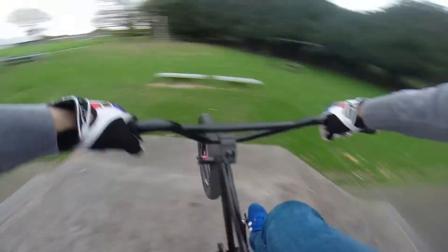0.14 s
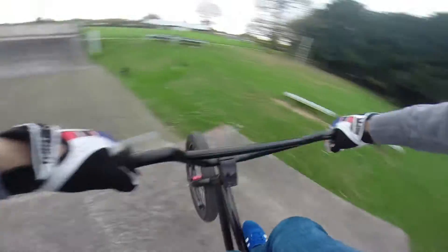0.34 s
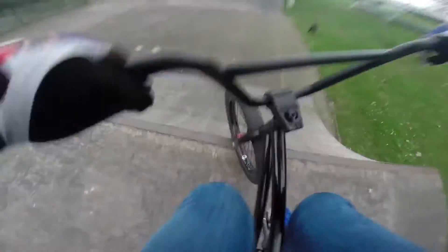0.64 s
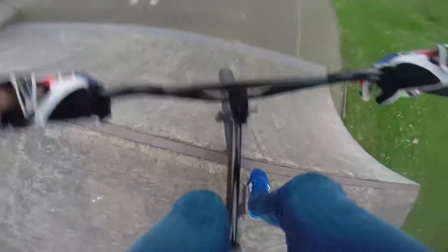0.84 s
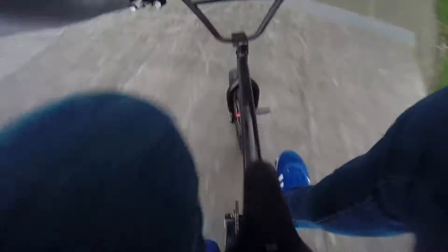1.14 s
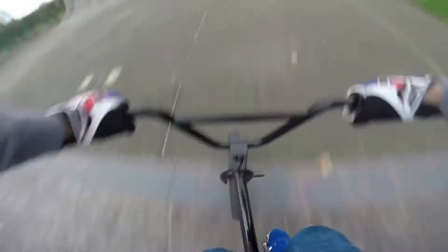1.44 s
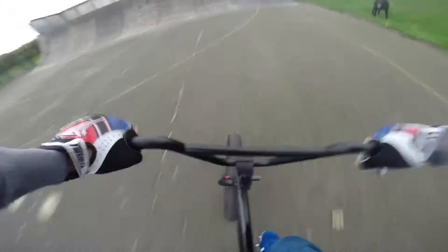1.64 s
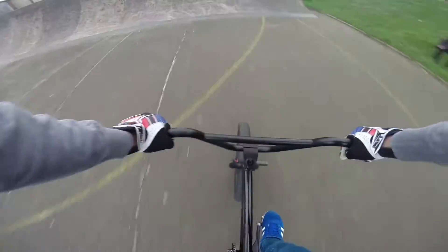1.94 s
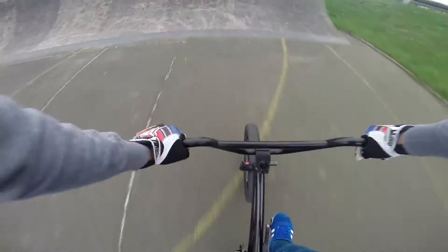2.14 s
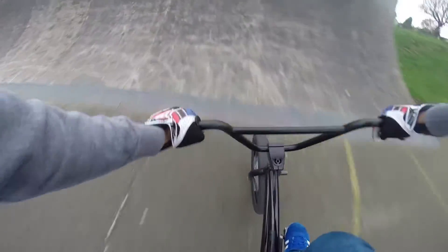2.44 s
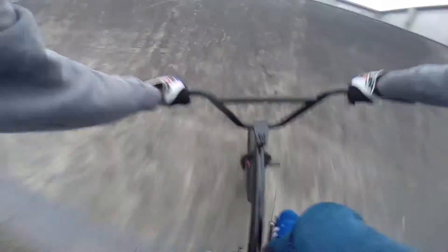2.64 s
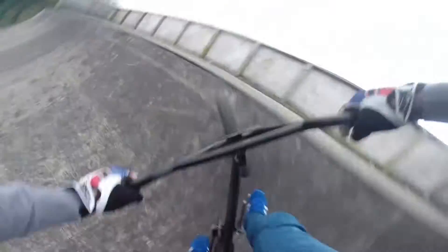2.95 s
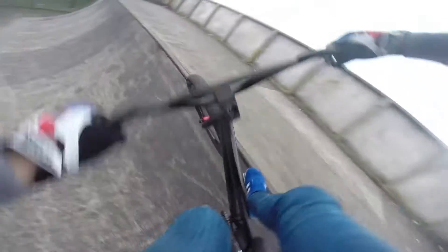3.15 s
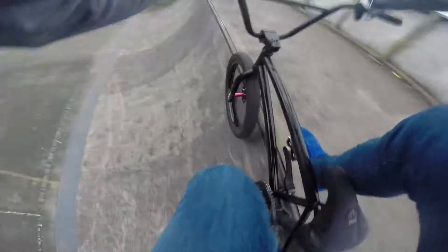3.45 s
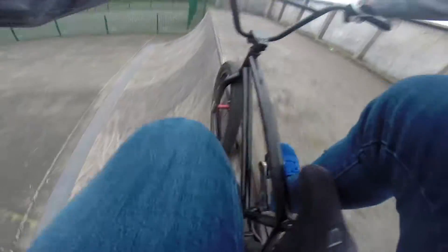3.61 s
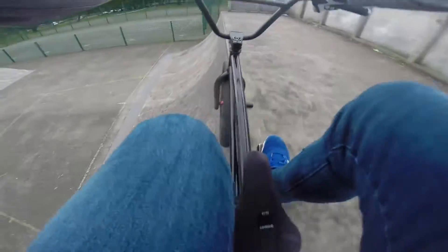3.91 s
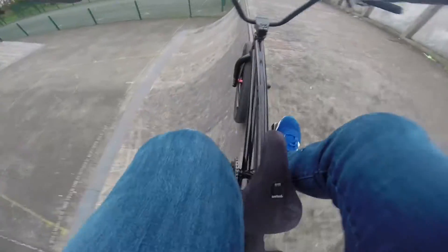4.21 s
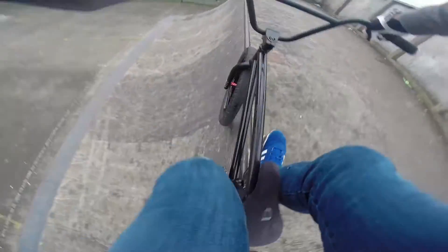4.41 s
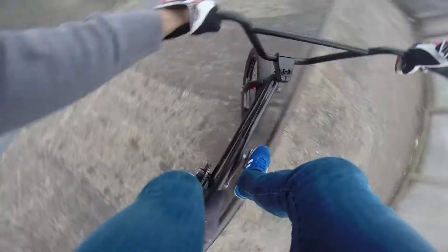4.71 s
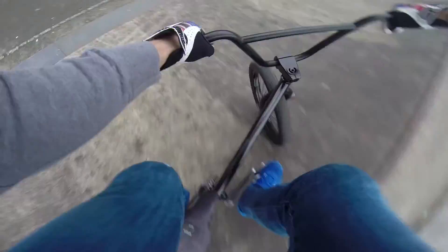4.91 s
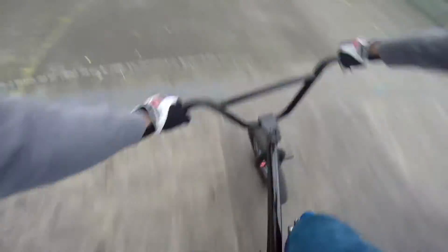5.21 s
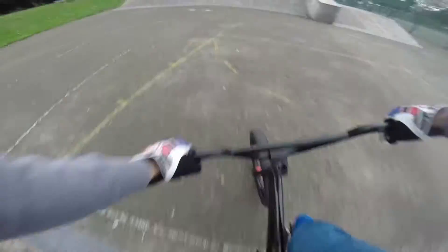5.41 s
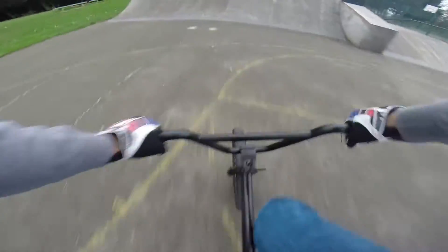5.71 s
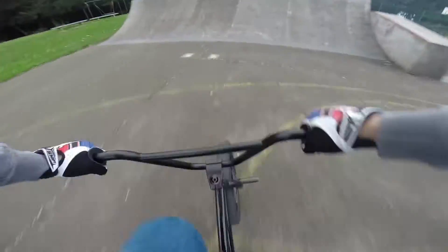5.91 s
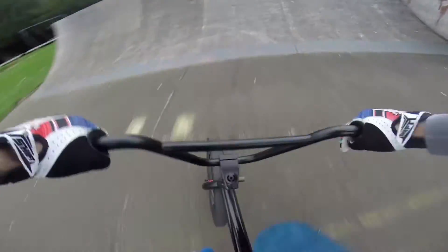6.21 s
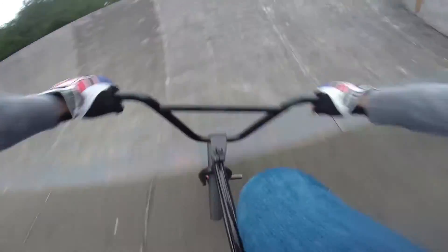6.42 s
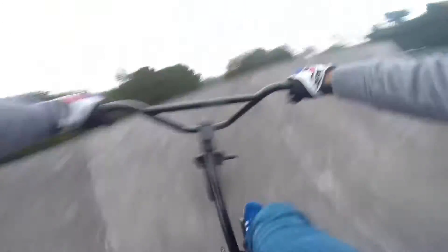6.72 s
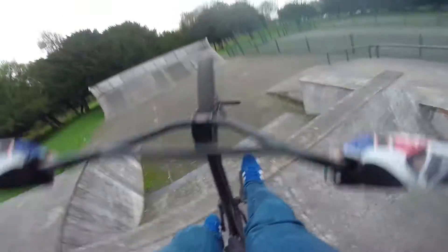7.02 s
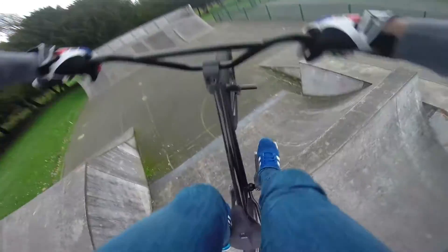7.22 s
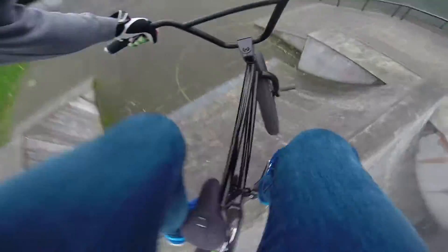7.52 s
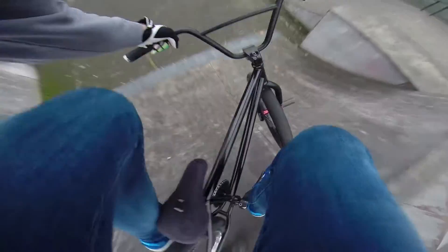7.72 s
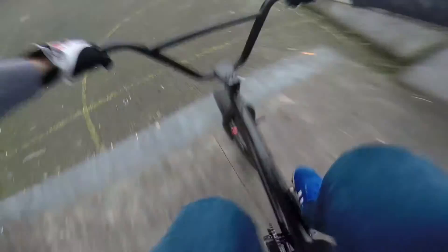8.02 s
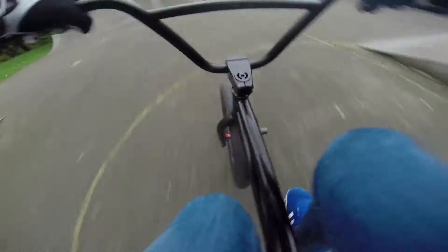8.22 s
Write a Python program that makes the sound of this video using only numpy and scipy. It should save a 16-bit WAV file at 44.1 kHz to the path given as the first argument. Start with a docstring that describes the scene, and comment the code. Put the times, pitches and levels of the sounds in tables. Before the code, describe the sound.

A small bike rides concrete ramps, captured by a boxed-in microphone on the rider's body. Deep soft thumps and dull tyre hiss come first, then loud plastic cracks and a big low jolt. Two metallic clanks lead into a short, weakening scrape with a thin squeal. The freewheel ticks and whirrs, more knocks snap, and a cluster of violent thuds and clatter ends in quiet rolling. Faint electronic whine and hiss stay underneath.

```python
"""Concrete ramps: a small bike is ridden, heard by a microphone sealed in a plastic case on the rider's chest.
Damped bounces and tremor of the body shake it; noise makes the rumble and hiss of the tyres through the case.
Struck modes ring in the knocking case and in a steel axle peg that clanks, grinds and sings on a ramp edge.
Ticks, scuffs and low rumbles on the case are short coloured noises, the freewheel is a train of ticks,
electronics whine as thin sines and the microphone hisses faintly as banded noise."""
import sys
import numpy as np
from scipy import signal
from scipy.io import wavfile
from scipy.ndimage import map_coordinates

SR = 44100
rng = np.random.default_rng(int(sys.argv[2]) if len(sys.argv) > 2 else 0)


def wav_record(signal):
    """Record a signal, one row per channel, as 16-bit PCM in the file named by sys.argv[1]."""
    frames = np.transpose(np.atleast_2d(signal))
    bounded = np.clip(frames, -1, 1)
    # unit amplitude maps onto the largest positive 16-bit level
    quanta = np.round(bounded * 32767).astype(np.int16)
    wavfile.write(sys.argv[1], SR, quanta)


N = 368235

# All levels hold ahead of the gain and peak rounding in record(); levels of modes and spectra are relative.
# Jolts of the body: (time [s], peak level [dB], settled bounce frequency [Hz])
BODY_JOLTS = [(0.197, -25.5, 22.4), (0.543, -22, 50.5), (0.617, -19.5, 25.3), (0.675, -14, 32),
              (0.829, -14.5, 21.8), (0.911, -20.0, 23), (1.172, -15.5, 25), (1.212, -13, 40.6),
              (1.281, -17, 23.6), (1.356, -19, 28), (1.435, -18.5, 21.7), (1.566, -19.5, 20.7),
              (1.677, -22, 47), (1.84, -24, 21.8), (1.979, -28, 29), (2.148, -25.5, 40),
              (2.343, -20.5, 29.9), (2.647, -22.5, 29), (3.016, -7.5, 24.2), (3.41, -19, 25.2),
              (3.49, -19.5, 21.7), (3.547, -16.5, 43.2), (4.151, -28.5, 70.5), (4.857, -25, 23.3),
              (5.219, -25.5, 21.6), (5.278, -29.5, 23.2), (5.57, -29.5, 21.55), (5.947, -31, 24.7),
              (6.125, -25, 21.4), (6.392, -22.5, 29.9), (6.789, -15.5, 53), (6.93, -18, 24.4),
              (7.335, -28, 21.6), (7.665, -27.5, 38.2), (7.902, -7.5, 23.7), (7.954, -7.5, 54),
              (7.972, -15.5, 26.4), (8.012, -4.5, 38.9), (8.035, -7.5, 53.7)]
# Tremor of the chest between jolts: (time [s], level [dB])
TREMOR_LEVEL = [(0.0, -26.5), (0.58, -43.5), (0.74, -28), (1.16, -45.5), (1.93, -31), (3.63, -42.5),
                (3.95, -44.5), (6.74, -30.5), (7.68, -52.5), (8.12, -39), (8.35, -37.5)]
# Spectrum of the steady tremor: (frequency [Hz], density [dB per Hz])
TREMOR_SPECTRUM = [(8.8, -12), (15, 5), (27, -1), (39, -35.5), (65, -16.5), (149, -23), (200, -39),
                   (260, -69)]
# Tyre hiss through the case: (time [s], level [dB])
ROLLING_LEVEL = [(0, -50.5), (.3, -64), (.65, -51), (.98, -57), (1.37, -51), (2.16, -52.5), (2.4, -56),
                 (3.32, -56), (3.56, -42), (3.8, -47), (4.25, -54), (4.65, -58), (4.85, -54), (5.08, -57.5),
                 (5.5, -51), (6.16, -58), (6.65, -51), (7.05, -60.5), (7.5, -58), (8.35, -55)]
# Spectrum of the tyre rumble: (frequency [Hz], density [dB per Hz])
RUMBLE_SPECTRUM = [(41, -67), (70, 2), (109, 1.5), (195, -7), (388, -13), (617, -21.5), (1200, -16.5),
                   (1560, -46)]
# Case resonances that colour steady sound: (frequency [Hz], bandwidth [Hz], level [dB])
CASE_RESONANCES = [(1443, 223, -1.5), (2213, 180, 5.5), (2960, 310, -2), (3520, 174, -1), (4360, 120, -7),
                   (4790, 170, -6), (5480, 1260, -10.5), (7020, 130, -17)]
# Knocks of the case in its mount: (time [s], peak level of the crack [dB], hardness [dB per octave])
CASE_KNOCKS = [(0.185, -35, 10.5), (0.455, -36.5, 8), (0.529, -24.5, 17.5), (1.236, -28, 12),
               (1.397, -11, 3), (2.359, -30, -2.5), (2.705, -14, 4.5), (2.84, -1.5, 9.5), (2.942, -7, 6.5),
               (4.545, -37, 12), (5.337, -32, -1.5), (5.483, -15.5, 2.5), (5.934, -40, 16),
               (6.072, -35, 14), (6.135, -33.5, 13), (6.207, -35, -1), (6.625, -3, 6.5), (6.7492, -2, 11.5),
               (7.767, -30, 1), (7.788, -27, 3.5), (7.828, -26, 3), (7.866, -24.5, 5), (7.89, -24, 3.5),
               (7.902, -23, 4.5), (7.94, -20.5, 7), (7.964, -24, 14), (7.971, -4, 2), (7.982, -10.5, 0.5),
               (8.036, -9, 2.5), (8.043, -9.5, 5.5), (8.092, -15, 7), (8.101, -33, 31)]
# Modes of the struck case: (frequency [Hz], level [dB], t60 [s], at least 0.002 s in use)
CASE_MODES = [(672, 12, 0.0054), (1017, 12, 0.0035), (1387, 5.5, 0.0072), (2212, -16, 0.048),
              (2204, 4, 0.018), (3025, -6.5, 0.0092), (3615, -10, 0.0093), (4330, -6, 0.0014),
              (5010, -10, 0.0041), (6280, -21, 0.0035), (7180, -33.5, 0.0062)]
# Modes of the chest plate: (frequency [Hz], level [dB], t60 [s])
PLATE_MODES = [(149.5, 5, 0.055), (289.4, 2, 0.031)]
# Short coloured noises on the case, ticks, scuffs and low rumbles:
# (time [s], peak level [dB], colour frequency [Hz], length [s])
SHORT_NOISES = [(0.589, -31.5, 1440, 0.003), (0.591, -28.5, 104, 0.023), (0.836, -34, 1430, 0.01),
                (1.075, -33, 2300, 0.18), (1.323, -37.5, 6500, 0.011), (1.606, -34.5, 1180, 0.029),
                (1.765, -37, 1090, 0.032), (1.826, -27, 1350, 0.025), (1.846, -25, 280, 0.013),
                (2.03, -29, 1400, 0.0033), (2.073, -23, 1350, 0.0059), (2.169, -27.5, 1350, 0.0061),
                (2.666, -26, 1220, 0.042), (2.727, -26.5, 184, 0.1), (3.019, -31, 1010, 0.02),
                (3.34, -36, 1340, 0.011), (3.386, -33, 2930, 0.021), (3.442, -30.5, 2270, 0.0066),
                (3.468, -30.5, 3310, 0.0069), (3.506, -23.5, 3100, 0.017), (4.231, -30.5, 1380, 0.0042),
                (4.73, -37, 2380, 0.26), (5.19, -42, 4380, 0.16), (6.544, -27, 433, 0.047),
                (6.592, -21.5, 1620, 0.031), (6.658, -30, 248, 0.069), (6.782, -36.5, 905, 0.0088),
                (6.845, -40.5, 1290, 0.017), (7.907, -25.5, 2170, 0.11), (8.018, -24.5, 2185, 0.0074)]
# Peg meets ramp edge: (time [s], strength [dB], pitch factor [ratio], chatter decay [s], free ringing [s])
PEG_CLANKS = [(3.537, -14.5, 1.055, 0.062, 0.029), (3.571, -6, 1.001, 0.0086, 0.097)]
# Modes of peg and axle: (frequency [Hz], level [dB], t60 [s])
PEG_MODES = [(1583, -1, 0.12), (1643, 5, 0.047), (1910, 16.5, 0.0087), (2800, 17, 0.0042), (4240, 3, 0.05),
             (4390, -3, 0.22), (7300, -26, 0.39), (7470, -2, 0.015), (11500, -24, 0.28)]
# Resonances of the grinding peg, each passed twice: (frequency [Hz], bandwidth of one pass [Hz], level [dB])
GRIND_RESONANCES = [(805, 750, -8.5), (1475, 350, 0.5), (2120, 450, -1.5), (2660, 330, 0.5),
                    (3350, 136, 3.5), (5800, 2100, -21.5)]
# Freewheel: (time [s], pawl rate [ticks per s], level through the frame [dB])
FREEWHEEL_COURSE = [(0, 61, -88), (1.1, 163, -60), (1.6, 276, -58.5), (2.6, 193, -54.5), (3.1, 89, -58.5),
                    (3.5, 94, -49), (3.7, 79, -49), (4.3, 34, -85), (5.0, 46, -61.5), (5.2, 75, -54.5),
                    (5.6, 175, -54.5), (6.1, 170, -70), (7.05, 78, -68.5), (7.3, 85, -55), (7.6, 67, -57.5),
                    (7.85, 80, -52), (8.35, 83, -60)]
# Pawl modes in the frame, later weighted by frequency: (frequency [Hz], level [dB], t60 [s])
PAWL_FRAME_MODES = [(2300, -3, .012), (2940, -6, .02), (3330, 1.5, .014), (4300, -10, .015),
                    (4660, -4, .016), (5005, -4, .02), (5750, -13, .018)]
# Pawl modes in air, later weighted by frequency: (frequency [Hz], level [dB], t60 [s], at least 0.002 s in use)
PAWL_AIR_MODES = [(7160, -5.5, 0.008), (9940, -5.5, 0.00097), (12300, -6.5, 0.0017)]
# Spectrum of the faint steady microphone hiss: (frequency [Hz], density [dB per Hz])
MIC_HISS_SPECTRUM = [(2940, -17), (5000, -19), (7820, 10), (9110, -11), (11100, -26), (15200, -14)]
# Overtones of the electronics: (frequency [Hz], mean level [dB rms])
WHINE_TONES = [(5852, -77.5), (8780, -75.5), (11705, -86), (14626, -81)]

BOUNCE_CYCLES, PUSH_CYCLES = 4.04, 0.49   # bounces to die by 60 dB; softness of the push
STIFF_CYCLES, SLACKEN_CYCLES = 0.31, 0.17   # squeezed chest starts quicker: cycles gained, and over how many
RUMBLE_OVER_HISS_DB = 5
# rumble left by a blow: levels below the peak of a knock and of a jolt, time to die by 1/e
SHUDDER_DB, JOLT_SHUDDER_DB, SHUDDER_S = -15.5, -25, 0.0091
# chest plate: push level at a full blow, dB lost per dB of a softer knock, delay
THUD_DB, THUD_GROWTH, THUD_LAG_S = -13, 1.21, 0.00647
PEG_SHARP, PEG_SETTLE_S = 0.0485, 0.0121   # under load the ring starts sharp by this share and sags
GRIND_START_S, GRIND_LIFT_START_S, GRIND_DB = 3.65, 4.194, -42.5   # level at the start
GRIND_RISE_S, GRIND_FADE_DB_PER_S, GRIND_LIFT_S = 0.01, 17, 0.12
GRIND_RUMBLE_DB = 0   # rumble of the grind against its hiss
SQUEAL_S, SQUEAL_LENGTH_S, SQUEAL_HZ, SQUEAL_DB = 3.9, 0.11, 4306, -56.5
HUB_AIR_DB = -14   # through the air, against the frame
MIC_HISS_DB = -83.5
CUTOFF_HZ = 15400


def from_db(db):
    """Logarithmic level: 20 dB is a factor of ten in amplitude."""
    return 10 ** (np.asarray(db) / 20)


def rms_one(x):
    """Normalisation: scale to a root mean square of 1."""
    return x / np.sqrt(np.mean(x ** 2) + 1e-20)


def in_time(rows):
    """Linear interpolation: table columns as curves, one value a sample."""
    s, *columns = np.transpose(rows)
    return [np.interp(np.arange(N) / SR, s, c) for c in columns]


def drift(rate):
    """Low-passed noise: a slow random curve of spread 1, with its corner near rate in Hz."""
    r = np.exp(-40 * np.pi * rate / SR)   # one step is 20 samples
    white = rng.standard_normal(N // 20 + 4002)
    slow = signal.lfilter([1], [1, -2 * r, r * r], white)[4000:]   # past the start-up
    return np.interp(np.arange(N) / 20, np.arange(len(slow)), rms_one(slow))


def ring(clicks, hz, t60):
    """Damped oscillator: a unit click sets off a decaying sine of height 1; t60 is at least 2 ms."""
    r = from_db(-60 / (max(t60, .002) * SR))
    w = 2 * np.pi * hz / SR
    return signal.lfilter([0, np.sin(w)], [1, -2 * r * np.cos(w), r * r], clicks + 1e-18)


def resonance(x, hz, width_hz):
    """Driven resonator: a band-pass with a gain of 1 on top."""
    r = np.exp(-np.pi * width_hz / SR)
    poles = [1, -2 * r * np.cos(2 * np.pi * hz / SR), r * r]
    return signal.lfilter([(1 - r * r) / 2, 0, (r * r - 1) / 2], poles, x)


def filtered(x, order, hz, kind="low"):
    """Butterworth filter: a flat pass band with smooth skirts."""
    return signal.sosfilt(signal.butter(order, hz, kind, fs=SR, output="sos"), x)


def banded_noise(spectrum, patchy_db, rate):
    """Band synthesis: half-octave noises, each with its own level and flicker, sum to rms 1."""
    hz, level_db = np.transpose(spectrum)
    edges = np.geomspace(hz[0], hz[-1], round(2 * np.log2(hz[-1] / hz[0])) + 2)
    out, together = 0, drift(rate)
    white = rng.standard_normal((2, N))   # neighbouring bands take different noise
    for k, (low, high) in enumerate(zip(edges, edges[1:])):
        band = filtered(white[k % 2], 2, [low, high], "band")
        centre_db = np.interp(np.log(low * high) / 2, np.log(hz), level_db)
        flicker_db = patchy_db * (together + drift(rate))
        out = out + band * from_db(centre_db + flicker_db)
    return rms_one(out)


def grit(per_s, spread_db):
    """Impulse noise: random clicks of uneven size and either sign, rms 1."""
    excess = np.minimum(rng.exponential(1, N), 5)
    sizes = from_db(spread_db * excess) * rng.choice([-1, 1], N)
    return rms_one(sizes * (rng.random(N) < per_s / SR))


def jolts():
    """Damped mass on a stiffening spring: a blunt push, then a few low bounces that slow down."""
    out = np.zeros(N)
    for s, peak_db, hz in BODY_JOLTS:
        cycles = np.arange(SR // 2) * hz / SR
        phase = cycles - STIFF_CYCLES * np.expm1(-cycles / SLACKEN_CYCLES)
        decay = np.exp(-np.log(1000) * cycles / BOUNCE_CYCLES)
        push = -np.expm1(-cycles / PUSH_CYCLES)
        bounce = np.sin(2 * np.pi * phase) * decay * push
        i = int(s * SR)
        out[i:i + len(bounce)] += (from_db(peak_db) * bounce / np.abs(bounce).max())[:N - i]
    return out


def shake():
    """Random excitation: the chest moves in separate low lumps, over a tremor."""
    lumps = filtered(grit(per_s=30, spread_db=1.2), 2, [20, 50], "band")
    lumps = filtered(lumps, 2, 90)
    tremor = banded_noise(TREMOR_SPECTRUM, patchy_db=-2.0, rate=3.0)
    return from_db(in_time(TREMOR_LEVEL)[0]) * rms_one(rms_one(lumps) + 1.1 * tremor)


def shudder():
    """Exponential decay of energy: gain of the rumble that each knock and jolt leaves in the bike."""
    blows = np.zeros(N)
    for table, below_db in ((CASE_KNOCKS, SHUDDER_DB), (BODY_JOLTS, JOLT_SHUDDER_DB)):
        s, peak_db, _ = np.transpose(table)
        blows[(s * SR).astype(int)] += from_db(peak_db + below_db)
    return signal.lfilter([1], [1, -np.exp(-1 / (SHUDDER_S * SR))], blows)


def case_hiss():
    """Resonant transmission: tread and grit on concrete through case resonances that come and go."""
    contact = rng.standard_normal(N) * from_db(2.2 * drift(30))
    contact = contact + .35 * grit(per_s=60, spread_db=3)
    out = 0.045 * contact
    for k, (hz, width, db) in enumerate(CASE_RESONANCES):
        gain = from_db(db + 2.2 * drift(10.7))
        out = out + (-1) ** k * gain * resonance(contact, hz, width)   # alternating sign
    return rms_one(out)


def rolling():
    """Rough contact: tyres on concrete give low rumble, swollen by blows, and hiss through the case."""
    hiss_db, = in_time(ROLLING_LEVEL)
    rumble_gain = from_db(hiss_db + RUMBLE_OVER_HISS_DB) + shudder()
    rumble = rumble_gain * banded_noise(RUMBLE_SPECTRUM, patchy_db=1.3, rate=25)
    return rumble + from_db(hiss_db) * case_hiss()


def knocks():
    """Modal impact: faces meet and rattle; hardness tilts the modes; the chest plate follows."""
    out, push, step = np.zeros(N), np.zeros(N), np.arange(SR // 20)
    for s, peak_db, hardness in CASE_KNOCKS:
        contact = .1 * rng.standard_normal(len(step)) * np.exp(-step / (.002 * SR))
        contact[0] = 1
        crack = 0.15 * contact
        for k, (hz, db, t60) in enumerate(CASE_MODES):
            mode_db = db + hardness * np.log2(hz / 2150) + 1.5 * rng.standard_normal()
            crack = crack + (-1) ** k * from_db(mode_db) * ring(contact, hz, t60)
        crack = filtered(crack, 2, 7000)   # plastic on plastic is never quite sharp
        i = int(s * SR)
        out[i:i + len(step)] += from_db(peak_db) * crack / np.abs(crack).max()
        push[i + int(THUD_LAG_S * SR)] = -from_db(THUD_GROWTH * peak_db + THUD_DB)
    return out + sum(from_db(db) * ring(push, hz, t60) for hz, db, t60 in PLATE_MODES)


def short_noises():
    """Band-filtered noise bursts: ticks, scuffs and low rumbles of one colour, partly ringing the case."""
    out = np.zeros(N)
    grain = rng.standard_normal(N) + 0.38 * grit(per_s=1100, spread_db=10.5)
    grain = filtered(grain, 3, 7000)   # the sealed case shuts out the top
    case_hz, case_width_hz, _ = CASE_RESONANCES[1]
    for s, peak_db, hz, length in SHORT_NOISES:
        t = np.arange(int(4 * length * SR)) / SR
        i = int(s * SR)
        envelope = np.minimum(t / (0.18 * length), 1) * np.exp(-(t / length) ** 2)
        burst = grain[i:i + len(t)] * envelope
        case_share = 0.39 * min(hz / 1000, 1) ** 2   # low colours ring the case less
        coloured = resonance(burst, hz, 0.17 * hz + 74.0) + 0.0051 * burst
        coloured = coloured + case_share * resonance(burst, case_hz, case_width_hz)
        out[i:i + len(t)] += from_db(peak_db) * coloured / np.abs(coloured).max()
    return out


def clanks():
    """Modal impact with contact damping: a click and dying chatter ring the peg until concrete damps it."""
    out, t = np.zeros(N), np.arange(SR // 2) / SR
    for s, strength_db, pitch, chatter, free in PEG_CLANKS:
        touches = 0.021 * rng.standard_normal(len(t)) * np.exp(-t / chatter)
        touches[0] = 1
        brief_touches = touches * np.exp(-t / .004)
        bell = 0
        for hz, db, t60 in PEG_MODES:
            drive = touches if t60 > .02 else brief_touches
            bell = bell + from_db(db) * ring(drive, hz * pitch, t60)
        # reading faster at first raises the pitch
        sagging_time = t - PEG_SHARP * PEG_SETTLE_S * np.expm1(-t / PEG_SETTLE_S)
        bell = map_coordinates(bell, [SR * sagging_time], order=3)
        i = int(s * SR)
        rubbing_db = 1.6 * drift(90)[i:i + len(t)]   # rough contact makes the ring flutter
        bell *= from_db(rubbing_db) * np.exp(-np.maximum(t - free, 0) / 0.012)
        crunch = resonance(resonance(rng.standard_normal(len(t)), 1500, 5800), 1800, 9200)
        crunch = crunch * np.exp(-t / 0.016)
        low_noise = resonance(rng.standard_normal(len(t)), 300, 540) * np.exp(-t / 0.019)
        thump = ring(touches, 210, 0.054) + 2.04 * low_noise
        blow = np.minimum(t / .0012, 1) * (.3 * bell + .3 * crunch + .35 * thump)
        out[i:i + len(t)] += from_db(strength_db) * blow
    return out


def grind():
    """Friction-driven resonance: steel dragged on concrete sends grit into the peg; it bites, fades, lifts."""
    drag = rng.standard_normal(N) * from_db(2.5 * drift(70))
    drag = drag + .9 * grit(per_s=500, spread_db=2.6)
    steel = 0
    for hz, width, db in GRIND_RESONANCES:
        mode = resonance(resonance(drag, hz, width), hz, width)
        steel = steel + mode * from_db(db + 2.4 * drift(6))
    frame = filtered(drag, 2, [80, 600], "band")
    t = np.arange(N) / SR
    bite = (t - GRIND_START_S) / GRIND_RISE_S
    lift = (GRIND_LIFT_START_S - t) / GRIND_LIFT_S + 1
    touching = np.clip(np.minimum(bite, lift), 0, 1)
    gain = touching * from_db(GRIND_DB - GRIND_FADE_DB_PER_S * (t - GRIND_START_S))
    return gain * (rms_one(steel) + from_db(GRIND_RUMBLE_DB) * rms_one(frame))


def squeal():
    """Narrow-band resonance: noise through one sharp peg mode sings as a thin, unsteady whistle."""
    since = (np.arange(N) / SR - SQUEAL_S) / SQUEAL_LENGTH_S
    tone = resonance(resonance(rng.standard_normal(N), SQUEAL_HZ, 30), SQUEAL_HZ, 30)
    envelope = np.clip(10 * since, 0, 1) * np.exp(-np.maximum(since, 0) ** 2)
    return from_db(SQUEAL_DB) * rms_one(tone) * envelope


def pawl_modes(rattle, modes):
    """Modal filtering: ticks ring a set of modes, each softened, weighted by frequency and wavering."""
    out = 0
    for hz, db, t60 in modes:
        struck = ring(rattle * from_db(1.6 * drift(6.7)), hz, t60)
        out = out + from_db(db) * ring(struck, hz, 0.002) * hz
    return rms_one(out)


def freewheel():
    """Periodic impacts: pawls drop nearly evenly, each a tiny rattle; fast ticks merge into a whirr."""
    per_s, frame_db = in_time(FREEWHEEL_COURSE)
    teeth = np.floor(np.cumsum(per_s * (1 + 0.05 * drift(36))) / SR)
    drops = np.diff(teeth, prepend=0) * np.sqrt(SR / per_s)   # same power at any rate
    tail = signal.lfilter([1], [1, -np.exp(-1 / (.003 * SR))], drops)
    rattle = drops + .3 * tail * rng.standard_normal(N)
    frame = pawl_modes(rattle, PAWL_FRAME_MODES)
    air = pawl_modes(rattle, PAWL_AIR_MODES)
    return from_db(frame_db) * (frame + from_db(HUB_AIR_DB) * air)


def mic_hiss():
    """Self-noise: the faint steady hiss of the microphone, as noise in bands."""
    return from_db(MIC_HISS_DB) * banded_noise(MIC_HISS_SPECTRUM, patchy_db=-4.5, rate=19.0)


def whine():
    """Amplitude-modulated sines: thin overtones from the electronics, wavering a little in level."""
    t, out = np.arange(N) / SR, 0
    for hz, db in WHINE_TONES:
        amplitude = np.sqrt(2) * from_db(db + 0.75 * drift(5.8))
        out = out + amplitude * np.sin(2 * np.pi * hz * t)
    return out


def scene():
    """Superposition: all sounds add at one microphone."""
    body = jolts() + shake()
    bike = rolling() + freewheel()
    case = knocks() + short_noises()
    peg = clanks() + grind() + squeal()
    background = mic_hiss() + whine()
    return (body + bike + case + peg + background)[None]


def record(dry):
    """Saturation and band limiting: gain of 1.25 for soft sound, rounded peaks, the top cut off."""
    rounded = 1.533 * np.tanh(dry / 1.225)
    return signal.sosfilt(signal.cheby2(8, 28, CUTOFF_HZ, fs=SR, output="sos"), rounded)


dry = scene()
out = record(dry)
wav_record(out)
```